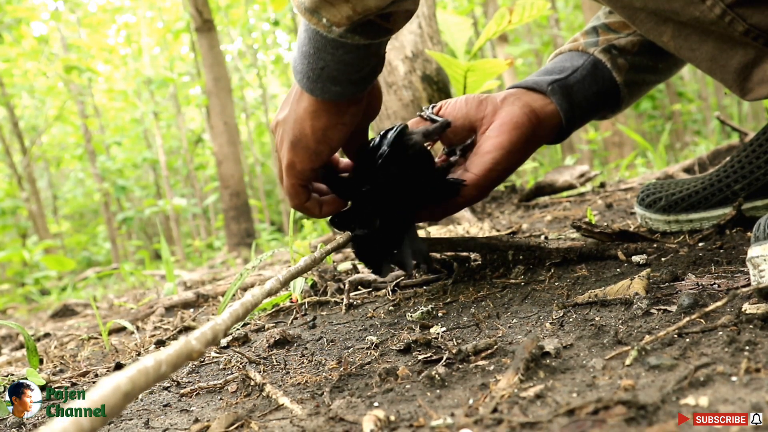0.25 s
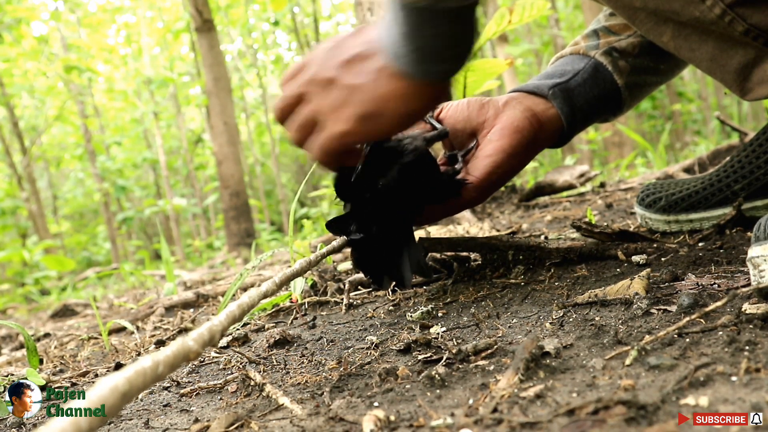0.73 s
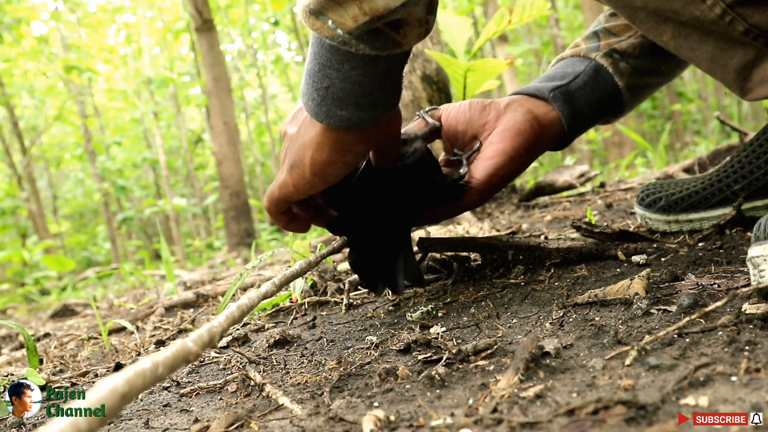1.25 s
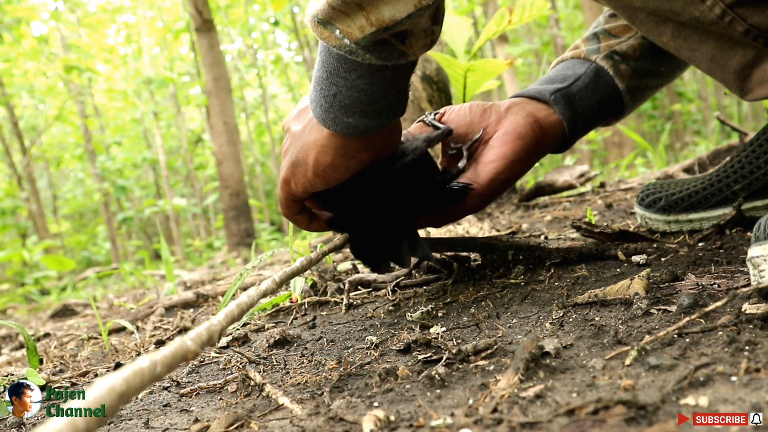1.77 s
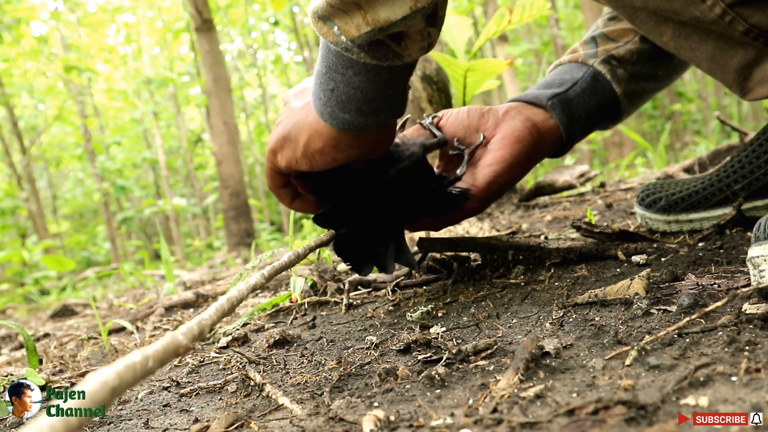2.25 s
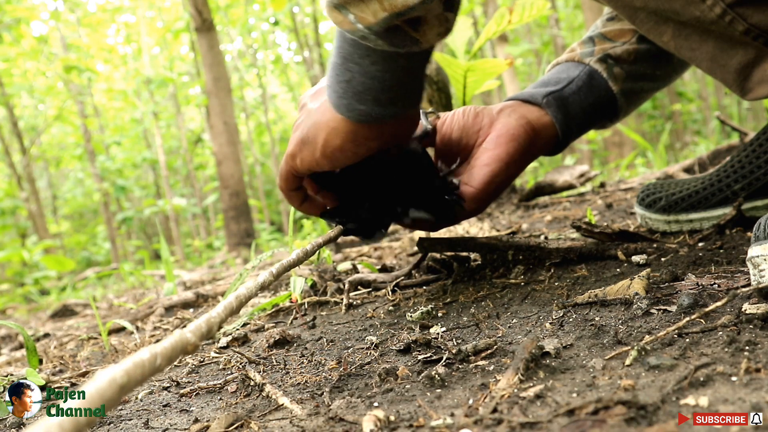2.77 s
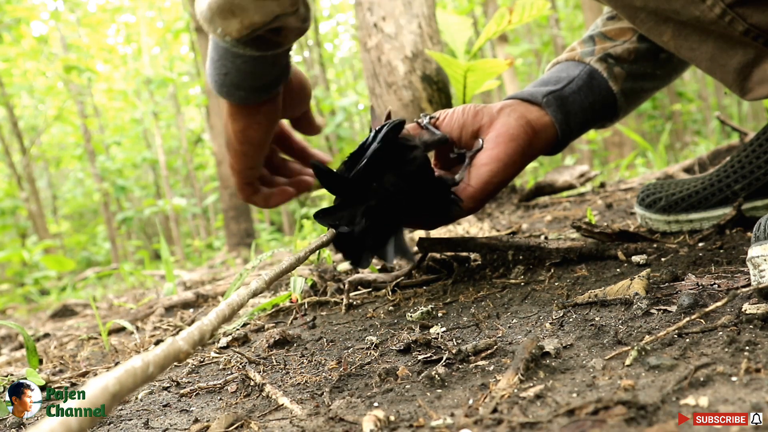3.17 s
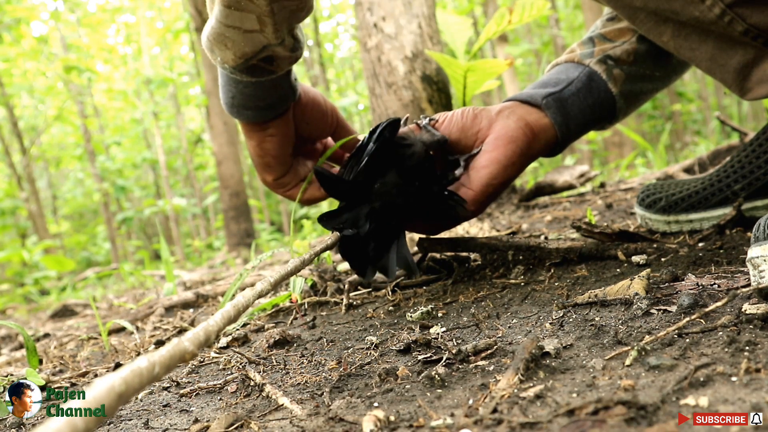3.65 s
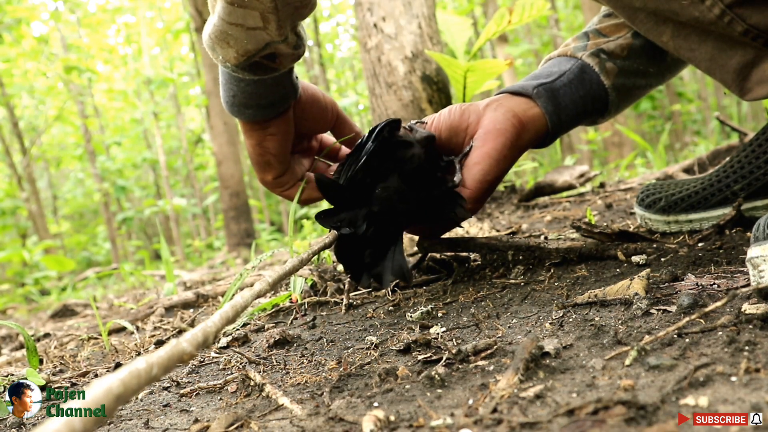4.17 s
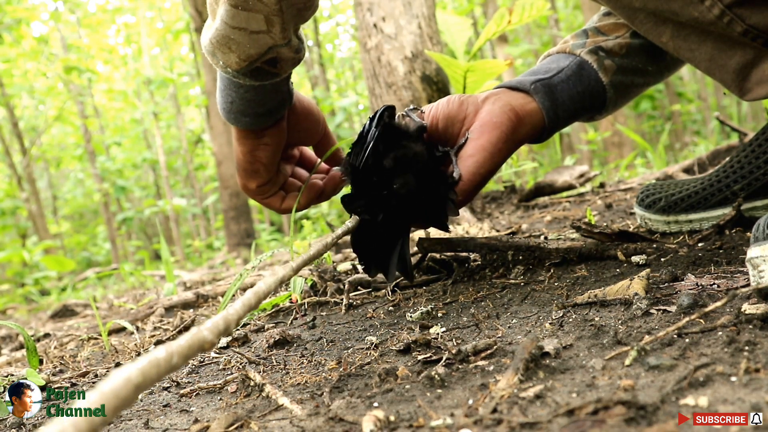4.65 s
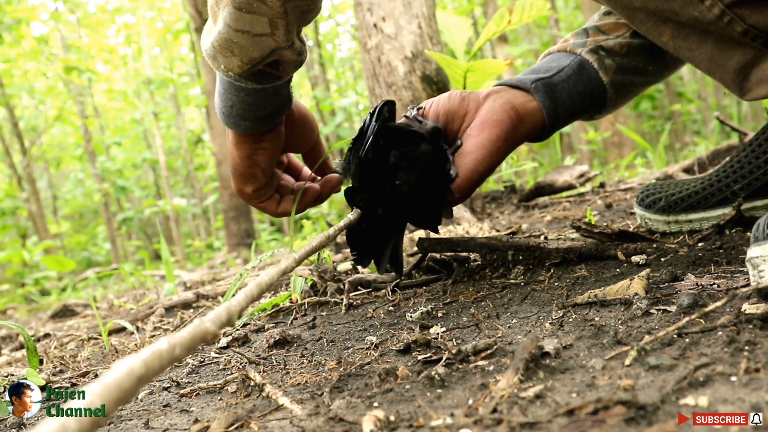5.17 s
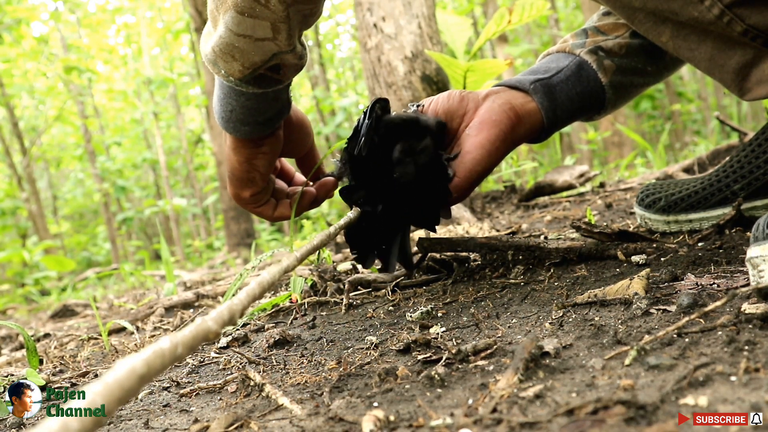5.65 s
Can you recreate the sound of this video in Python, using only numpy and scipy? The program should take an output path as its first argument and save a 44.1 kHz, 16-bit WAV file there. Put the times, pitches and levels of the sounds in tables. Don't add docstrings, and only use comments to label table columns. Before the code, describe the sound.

A fledgling in cupped hands squawks six times at close range, hoarse and raspy, each call climbing to a strained peak and stopping abruptly. Faint bird chirps slip between calls. After about four seconds it falls silent, leaving quiet woodland hiss, soft dove coos, leaf rustle and a brief clear songbird whistle. Near stereo microphone, short scattered echo off trunks.

```python
import sys
import numpy as np
from scipy import signal
from scipy.fft import rfft, irfft
from scipy.io import wavfile
from scipy.ndimage import uniform_filter1d

SR = 44100
rng = np.random.default_rng(int(sys.argv[2]) if len(sys.argv) > 2 else 0)


def store_wav(level_fs):
    pcm = np.round(np.clip(np.atleast_2d(level_fs), -1, 1) * 32767)
    wavfile.write(sys.argv[1], SR, pcm.T.astype(np.int16))


def linear_from_db(decibels):
    return 10 ** (np.asarray(decibels, float) / 20)


N = 261072

# start t/s, length t/s, opening level/dB, top level/dB, last surge/dB
SQUAWKS = [
    (-.03, .525, -34.5, -25, 1),
    (0.926, 0.38, -35, -26.5, 1),
    (1.548, 0.5, -41, -24, 0.5),
    (2.167, .399, -31.5, -24, 2),
    (2.768, .527, -29.5, -23.5, 4.5),
    (3.508, 0.37, -27, -25.5, 3.5),
]
# midway level/dB, treble of shut beak/dB, treble of open beak/dB, chest level/dB
EFFORTS = [(-1.46, 5, 9.9, -14.5), (1, 1.5, 5.7, -11.5), (2, 3, 9, -11.5), (-0.4, -0.5, 3.5, -12.5),
           (4.5, -0.6, 5.2, -16), (-0.05, -0.4, 2.8, -12.5)]
# t/s, f/Hz
PITCHES = [
    [(0, 800), (.2, 815), (.334, 925), (.4, 1200), (.445, 1300), (.495, 1040)],
    [(.927, 830), (1.15, 810), (1.19, 985), (1.243, 1130), (1.3, 980)],
    [(1.548, 800), (1.75, 815), (1.86, 994), (1.985, 1270), (2.055, 1130)],
    [(2.17, 770), (2.38, 845), (2.46, 941), (2.525, 1161), (2.575, 1060)],
    [(2.768, 790), (2.9, 890), (2.99, 935), (3.06, 1060), (3.105, 1050), (3.2, 1255), (3.243, 1285),
     (3.295, 1020)],
    [(3.508, 780), (3.67, 825), (3.74, 1005), (3.828, 1136), (3.875, 1013)],
]
# voice lock level/dB, hoarse end length t/s
STEADINESS = [(-1.5, .015), (-.5, .025), (-1, .075), (-1.5, .03), (1, .02), (-2.5, .03)]
# pitch f/Hz, locked voice level/dB, second voice level/dB
LOCKING = [(780, -9, -22), (900, -5, -19), (1100, -3, -10), (1300, -2.5, -4)]
# f/Hz, level/dB per Hz
THROAT = [(590, -28.5), (1000, -16.5), (1500, -9), (3500, -11), (7500, -19), (9500, -26.5), (12500, -38.5),
          (22000, -43)]
# f/Hz, width f/Hz, level/dB
FORMANTS = [
    [(1150, 53, 2), (1910, 150, 2.5), (4290, 280, 6.5), (5200, 820, 7), (7040, 1600, 10.5)],
    [(1240, 110, 9), (1880, 240, 11), (2430, 380, 11), (5020, 390, 8.5), (6670, 1800, 8.5)],
    [(1180, 140, 6.5), (1960, 460, 7), (3030, 220, 2.5), (4280, 2000, 8.5), (6960, 230, 6.5)],
    [(1870, 610, 6.5), (3000, 780, 7.5), (4940, 580, 9), (5750, 280, 7.5), (7450, 660, 3)],
    [(1830, 750, 3.5), (2895, 220, 11), (4800, 870, 15.5), (6980, 1440, 15.5), (10700, 1920, 14.5)],
    [(1730, 590, 5), (4100, 400, 3.5), (4960, 280, 9.5), (6420, 2370, 7.5), (10430, 830, 13.5)],
]
# f/Hz, width f/Hz, level/dB
GAPES = [
    [(2960, 190, -5), (5260, 230, 0.5)],
    [(2500, 430, -8), (4320, 450, 6)],
    [(1620, 300, 4), (4650, 660, 2.5)],
    [(2300, 180, -2), (4560, 380, 3.5)],
    [(2730, 480, -11), (4300, 250, 8)],
    [(2600, 380, -2.5), (4120, 450, 3.5)],
]
# f/Hz, width f/Hz, level/dB
HAND_DIPS = [
    [(1464, 90, -10), (3450, 140, -5.5), (5060, 130, -5.5), (9550, 140, 8.5), (10670, 210, 9.5)],
    [(5250, 110, -6), (7560, 200, -15), (9550, 240, -4), (11500, 150, -24)],
    [(3430, 234, -19), (4040, 300, -7.5), (5330, 64, -45), (6230, 220, -15), (9600, 130, 2)],
    [(3420, 160, -26), (4400, 680, 3.5), (5330, 190, -9), (6100, 210, -2.5), (12300, 240, -18)],
    [(4000, 890, -3.5), (5050, 130, -8.5), (6680, 200, -4.5), (12200, 600, -20)],
    [(2793, 65, -13), (3550, 170, -5), (4670, 110, -10), (6860, 130, -12), (9100, 220, -10)],
]
# f/Hz, level/dB
ASIDE = [(300, -5), (1300, -37), (2400, -9), (4300, -7), (8000, -3), (15000, 1.5)]
# f/Hz, width f/Hz, level/dB
ASIDE_DIPS = [(1900, 400, -14), (3950, 450, -22)]
# f/Hz, level/dB per Hz
ALL_ROUND = [(600, -22), (1200, -8), (2200, 0), (3500, 1.5), (5000, 1.5), (7000, -15), (9000, -20.5),
             (12000, -28)]
# f/Hz, level/dB
TRUNKS = [(300, -46), (1000, -4), (2500, -2), (5000, -2), (8000, 2), (15000, -9)]
# t/s, f/Hz, level/dB
NEAR_NOTES = [
    [(5.235, 2800, -47), (5.255, 3794, -44), (5.328, 3840, -50), (5.335, 3814, -27), (5.355, 3820, -38),
     (5.378, 3560, -40), (5.4, 2460, -39)],
    [(5.28, 1880, -49), (5.35, 1936, -41), (5.41, 1866, -55)],
    [(5.488, 1860, -44), (5.505, 1882, -25.5), (5.53, 1943, -28.5), (5.57, 2530, -23.5), (5.6, 2550, -35.5),
     (5.62, 2500, -33)],
    [(5.618, 3380, -46), (5.64, 3200, -36), (5.665, 2750, -42)],
]
# t/s, f/Hz, level/dB
FAR_NOTES = [
    [(.61, 2140, -50), (.65, 2170, -52), (.72, 2180, -56), (.8, 2150, -66)],
    [(.74, 1780, -68), (.84, 1787, -58), (.87, 1790, -66)],
    [(3.99, 5210, -57), (4.03, 4500, -49), (4.08, 3560, -38), (4.1, 3050, -37), (4.125, 2450, -51)],
    [(4.085, 2300, -57), (4.115, 1900, -49), (4.155, 1410, -54)],
]
# t/s, length t/s, from f/Hz, to f/Hz, level/dB
CHIRPS = [(.72, .02, 4260, 3680, -50), (.768, .017, 4220, 3930, -57), (.774, .01, 2430, 3500, -43),
          (.806, .02, 3780, 2480, -47), (.825, .02, 4360, 4140, -60), (.875, .02, 4300, 4100, -66),
          (.86, .04, 3100, 3050, -64), (3.925, .025, 4000, 2820, -43), (2.715, .053, 4750, 4400, -54),
          (5.05, .2, 4400, 4350, -68), (5.83, .015, 1480, 1050, -57)]
# t/s, length t/s, f/Hz, level/dB
COOS = [
    (4.494, 0.15, 336, -57),
    (4.802, 0.12, 324, -54),
    (5.066, 0.13, 327, -54),
    (5.397, 0.11, 322, -53),
]
# t/s, length t/s, centre f/Hz, width f/Hz, level/dB
RUSTLES = [
    (4.25, 0.085, 6000, 710, -63),
    (4.523, 0.087, 6200, 750, -60),
    (14, .09, 6000, 1000, -59),
    (8.5, 0.025, 5300, 700, -63),
    (4.979, 0.016, 450, 220, -47.5),
    (5.23, 0.1, 2600, 1200, -44),
    (5.53, 0.1, 1540, 550, -51),
    (5.25, 0.18, 9200, 7900, -56),
    (5.492, 0.15, 9500, 2000, -52),
]
# f/Hz, level/dB per Hz
WOOD_MID = [(76, -30), (130, -2), (210, -5.5), (682, -11.5), (1080, -13), (2630, -17), (3510, -19.5),
            (4870, -22), (5460, -20.5), (6880, -23), (7580, -31), (10700, -35.5), (13000, -40)]
# f/Hz, level/dB per Hz
WOOD_SIDE = [(76, -29), (130, -5), (511, -4.5), (1860, -10), (3250, -15), (4250, -15), (4770, -17),
             (6880, -17.5), (7730, -22.5), (11800, -27), (13000, -29)]
# f/Hz, width f/Hz, level/dB
HUM = [(63.2, 10, -56.5), (89.3, 23, -49), (109.4, 11.6, -61), (45, 33, -65)]


def level(x, db):
    return x * linear_from_db(db) / np.sqrt(np.mean(x ** 2) + 1e-20)


def colour(x, points, dips=()):
    points_hz, points_db = np.transpose(points)
    f_hz = np.arange(1025) * SR / 2048 + 1
    gain_db = np.interp(np.log(f_hz), np.log(points_hz), points_db)
    gain_db = gain_db + sum(db * np.exp(-((f_hz - centre) / width) ** 2) for centre, width, db in dips)
    cepstrum = irfft(gain_db * np.log(10) / 20)
    cepstrum[1:1024] *= 2
    cepstrum[1025:] = 0
    return signal.fftconvolve(x, irfft(np.exp(rfft(cepstrum))))[:len(x)]


def band(x, centre_hz, width_hz):
    edges_hz = [centre_hz - width_hz / 2, centre_hz + width_hz / 2]
    return signal.sosfilt(signal.butter(2, edges_hz, "bandpass", fs=SR, output="sos"), x)


def walk(rate_hz, size):
    k = max(int(SR / rate_hz), 1)
    w = uniform_filter1d(uniform_filter1d(rng.standard_normal(size), k), k)
    return w / w.std()


def add(out, x, start_s):
    i = int(start_s * SR)
    x, i = x[max(-i, 0):], max(i, 0)
    out[i:i + len(x)] += x[:N - i]


def strain(t, call, effort, pitch):
    start_s, length_s, first_db, top_db, surge_db = call
    mid_db, shut_db, open_db, chest_db = effort
    fall_s = 0.048
    climb = np.clip(t / (length_s - fall_s), 0, 1)
    fall = np.clip(t - length_s + fall_s, 0, None) / fall_s
    hz = np.interp(start_s + t, *np.transpose(pitch))
    tense = ((hz - hz.min()) / np.ptp(hz)) ** 3.045
    gaping = np.maximum.accumulate(tense)

    db = first_db + (top_db - first_db) * climb
    db = db + mid_db * np.sin(np.pi * climb) + surge_db * gaping
    db = db - 7.5 * np.exp(-t / 0.02)
    db = db - 34.5 * fall ** 2.0
    beak_db = shut_db + (open_db - shut_db) * ((climb + gaping) / 2 - 0.66 * fall)
    chest_db = chest_db + 15.5 * np.exp(-t / 0.028) + 20.5 * fall
    hz = hz * (1 + 0.021 * (1 - tense) * walk(39.6, SR)[:len(t)])
    return hz, db, beak_db, chest_db, gaping


def snaps(hz, scatter_db):
    n = len(hz)
    cycles = np.cumsum(hz) / SR
    at = np.interp(np.arange(1, int(cycles[-1])), cycles, np.arange(n))
    size = linear_from_db(scatter_db * rng.standard_normal(n)[:len(at)])
    taps = at.astype(int)[:, None] + np.arange(-7, 9)
    off = taps - at[:, None]
    pulse = np.sinc(off) * np.cos(np.pi * off / 17) ** 2
    out = np.zeros(n + 16)
    np.add.at(out, taps + 7, size[:, None] * pulse)
    return level(out[7:n + 7] - out.mean(), 0)


def syrinx(hz, firm_db, hoarse_s):
    n = len(hz)
    left_s = (n - 1 - np.arange(n)) / SR
    at_hz, locked_db, second_db = np.transpose(LOCKING)
    rasp = snaps(3.2 * hz * np.exp(0.5 * walk(2500, n)), 3.0) * linear_from_db(1.3 * walk(400, n))
    locked = snaps(hz * (1 + 0.019 * walk(400, n)), 2.4) * linear_from_db(2.8 * walk(60, n))
    flutter_hz = 1.37 * hz * (1 + 0.022 * walk(30, n) + 0.014 * walk(400, n))
    flutter = snaps(flutter_hz, 2.5) * linear_from_db(-8.5 + 4 * walk(35, n))
    second = snaps(0.775 * hz * (1 + 0.022 * walk(400, n)), 2.5)

    voiced = linear_from_db(np.interp(hz, at_hz, locked_db)) * locked
    voiced = voiced + linear_from_db(np.interp(hz, at_hz, second_db)) * second
    voiced = voiced * linear_from_db(firm_db - 8 * np.clip(1.5 - left_s / hoarse_s, 0, 1))
    voiced = colour(voiced, [(900, 1), (1400, 1), (2500, 3), (3500, -1), (5000, -2), (6500, -12),
                             (12000, -25)])
    return level(rasp, 0) + colour(flutter, [(1500, -16), (2600, 0)]) + voiced, rasp


def lowpass(x, hz):
    return signal.sosfiltfilt(signal.butter(3, hz, fs=SR, output="sos"), x)


def steady(x):
    return x / np.sqrt(uniform_filter1d(x ** 2, size=3000) + 1e-12)


def squawk(call, effort, pitch, bells, gape, firm_db, hoarse_s):
    t = np.arange(int(call[1] * SR)) / SR
    hz, db, beak_db, chest_db, gaping = strain(t, call, effort, pitch)
    source, rasp = syrinx(hz, firm_db, hoarse_s)
    voice = (1 - gaping) * colour(source, THROAT, bells) + gaping * colour(source, THROAT, bells + gape)

    chest = lowpass(voice, 1780)
    below_beak = lowpass(voice, 3450)
    direct = linear_from_db(chest_db) * steady(chest) + steady(below_beak - chest)
    direct = direct + linear_from_db(beak_db) * steady(voice - below_beak)
    push = linear_from_db(db) * signal.windows.tukey(len(t), 0.045)
    sent = np.sqrt(1 + linear_from_db(2 * beak_db)) * steady(colour(source + rasp, ALL_ROUND))
    return push * direct, push * sent


def aside(voice):
    n = len(voice)
    smears = rng.standard_normal((2, 500)) * np.exp(-np.arange(500) / 100)
    one, other = (signal.fftconvolve(voice, h / np.linalg.norm(h))[:n] for h in smears)
    turn_rad = 1.4 * walk(12.2, n)
    return colour(np.cos(turn_rad) * one + np.sin(turn_rad) * other, ASIDE, ASIDE_DIPS)


def scatter(x, t60_s, db, onset_s):
    t = np.arange(SR) / SR
    hits = rng.standard_normal((2, SR)) * (rng.random((2, SR)) < 0.05)
    tails = hits * (1 - np.exp(-t / onset_s)) * linear_from_db(-60 * t / t60_s)
    x = colour(x, TRUNKS)
    return np.array([signal.fftconvolve(x, h * linear_from_db(db) / np.linalg.norm(h))[:N] for h in tails])


def fledgling():
    direct, side, around = np.zeros((3, N))
    for call, effort, pitch, formants, dips, gape, steadiness in zip(
            SQUAWKS, EFFORTS, PITCHES, FORMANTS, HAND_DIPS, GAPES, STEADINESS):
        voice, sent = squawk(call, effort, pitch, formants + dips, gape, *steadiness)
        add(direct, voice, call[0])
        add(side, aside(voice), call[0])
        add(around, sent, call[0])
    tail = scatter(around, t60_s=0.53, db=-12.5, onset_s=0.014)
    return np.array([direct + side, direct - side]) + tail


def whistle(rows):
    s, hz, db = np.transpose(rows)
    t = np.arange(s[0] * SR, s[-1] * SR) / SR
    n = len(t)
    pitch_waver, level_waver = (walk(91, SR // 2)[:n] for _ in range(2))
    glide_hz = np.interp(t, s, hz) * (1 + 0.006 * pitch_waver)
    tone = np.sin(2 * np.pi * np.cumsum(glide_hz) / SR)
    soft = signal.windows.tukey(n, min(0.0028 * SR / n, 1))
    return np.sqrt(2) * linear_from_db(np.interp(t, s, db) + 0.83 * level_waver) * tone * soft


def songbird(notes, direct, t60_s, db, onset_s):
    song = np.zeros(N)
    for rows in notes:
        add(song, whistle(rows), rows[0][0])
    mid, side = scatter(song, t60_s, db, onset_s)
    return direct * song + mid + 0.47 * side * np.array([[1], [-1]])


def dove():
    out = np.zeros(N)
    for start_s, length_s, hz, db in COOS:
        t = np.arange(int(length_s * SR)) / SR
        add(out, level(np.sin(2 * np.pi * hz * t) * np.hanning(len(t)), db), start_s)
    return out


def rustles():
    out = np.zeros(N)
    for start_s, length_s, hz, width_hz, db in RUSTLES:
        n = int(length_s * SR)
        grains = rng.standard_normal(n) * linear_from_db(walk(150, SR)[:n])
        add(out, level(band(grains, hz, width_hz) * signal.windows.tukey(n, 0.6), db), start_s)
    return out


def crickets():
    return np.array([level(band(rng.standard_normal(N), 7000, 71) * linear_from_db(7.7 * walk(3.4, N)), -64)
                     for _ in range(2)])


def woodland():
    mid = level(colour(rng.standard_normal(N), WOOD_MID), -49.5)
    for hz, width_hz, db in HUM:
        mid = mid + level(band(rng.standard_normal(N), hz, width_hz), db)
    side = level(colour(rng.standard_normal(N), WOOD_SIDE + [(14000, -46)]), -48)
    return np.array([mid + side, mid - side]) + crickets()


def scene():
    near = fledgling()
    closer = songbird(NEAR_NOTES, direct=1.0, t60_s=0.56, db=4, onset_s=0.0011)
    chirps = [[(s, from_hz, db), (s + length_s, to_hz, db)] for s, length_s, from_hz, to_hz, db in CHIRPS]
    distant = songbird(FAR_NOTES + chirps, direct=0.89, t60_s=0.89, db=5.0, onset_s=0.0027)
    small = (dove() + rustles()) * np.array([[1.3], [0.4]])
    return near + closer + distant + small + woodland()


def roll_off(x):
    return signal.sosfilt(signal.butter(12, 15280, fs=SR, output="sos"), x)


def record(dry):
    drive = dry / 0.88
    mix = 0.88 * np.tanh(drive + drive ** 3 / 3)
    return roll_off(mix)


dry = scene()
out = record(dry)
store_wav(out)
```